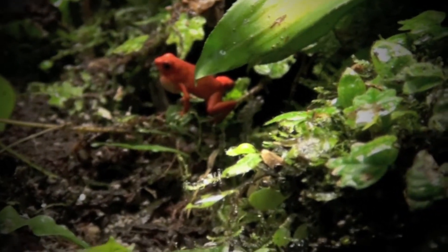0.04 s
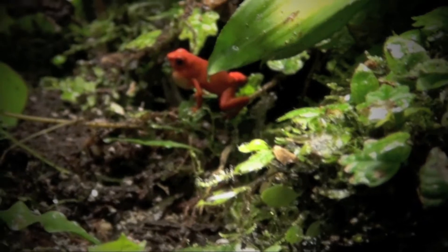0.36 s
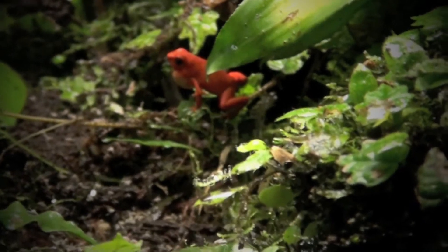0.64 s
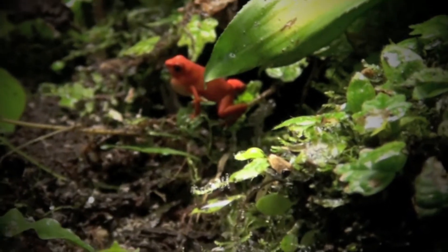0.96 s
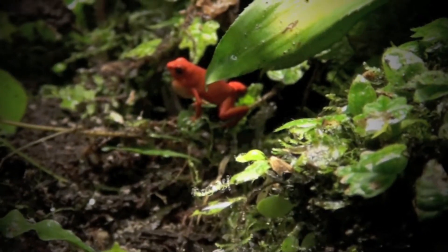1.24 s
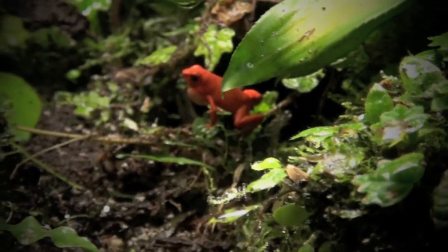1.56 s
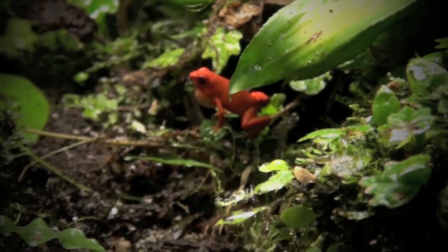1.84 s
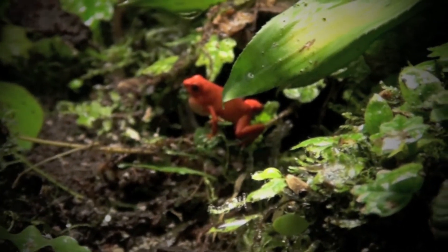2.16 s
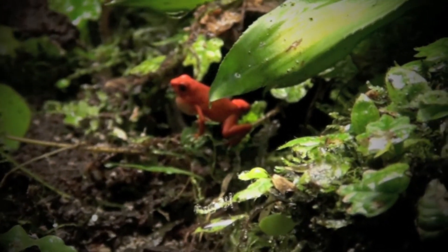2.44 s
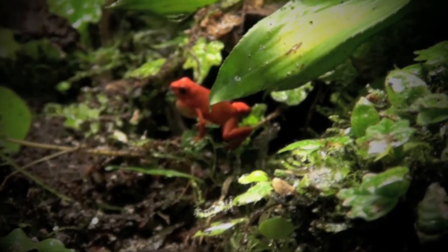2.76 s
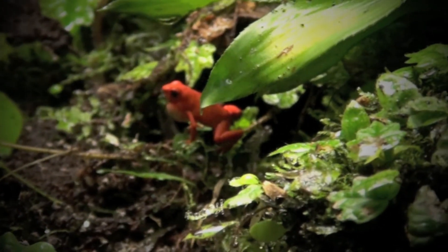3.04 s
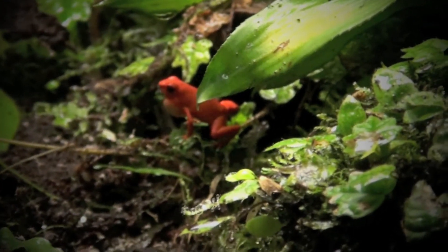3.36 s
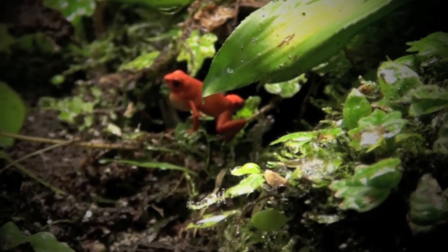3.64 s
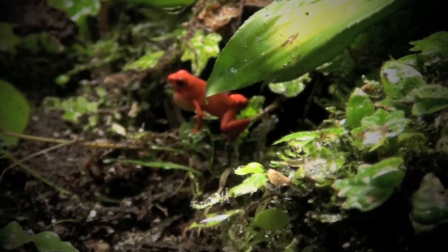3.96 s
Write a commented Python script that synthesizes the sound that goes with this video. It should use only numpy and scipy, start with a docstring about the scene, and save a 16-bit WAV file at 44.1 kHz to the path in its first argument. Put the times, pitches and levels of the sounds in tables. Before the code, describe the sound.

A tiny frog close to the microphone repeats harsh, high, buzzy chirps about six times a second without a break. The spot echoes slightly, and a faint machine hum, rumble and hiss lie behind the calls.

```python
"""In a faintly echoing spot near a humming machine, a tiny frog close by chirps six times a second.
Each chirp is a quickening train of pulses that excite the resonance of its vocal sac near 5 kHz,
with a bright overtone, a buzz of the vocal folds and a little rasp. The surroundings answer with a
short reverberant tail. Behind it lie steady hum, rumble and hiss, and a low drone swells at the end."""
import sys
import numpy as np
from scipy import signal
from scipy.fft import rfft, irfft
from scipy.io import wavfile

SR = 44100
rng = np.random.default_rng(int(sys.argv[2]) if len(sys.argv) > 2 else 0)


def persist_wave(psi):
    """Save psi, clipped to +-1, as 16-bit WAV."""
    counts = np.round(np.clip(psi, -1, 1) * 32767).astype(np.int16)
    wavfile.write(sys.argv[1], SR, np.atleast_2d(counts).T)


N = 176400
T = np.arange(N) / SR


def undb(db):
    return 10 ** (np.asarray(db) / 20)


def unit_rms(x):
    return x / np.sqrt(np.mean(x ** 2))


def stereo(mid, side):
    return np.array([mid + side, mid - side])


def impulse_response(spectrum, size=8192):
    """Minimum phase: the magnitude spectrum (Hz, dB) determines a causal response."""
    hz, db = np.array(sorted(spectrum), float).T
    bins_hz = np.maximum(np.arange(size // 2 + 1) * SR / size, 1)
    cepstrum = irfft(np.log(undb(np.interp(np.log(bins_hz), np.log(hz), db))))
    cepstrum[1:size // 2] *= 2
    cepstrum[size // 2 + 1:] = 0
    return irfft(np.exp(rfft(cepstrum)))


def colour(x, spectrum):
    """Linear filtering: convolution imposes a spectrum (Hz, dB) on a signal."""
    return signal.oaconvolve(x, impulse_response(spectrum))[:N]


def superpose(shape, times, db, pitch, size=512, oversample=8):
    """Superposition: copies of a short shape add, each at its own time, level and pitch ratio."""
    at = np.ceil(times * SR).astype(int)[:, None] + np.arange(size)
    age = (at - times[:, None] * SR) * pitch[:, None]
    fine = signal.resample_poly(shape[:size], oversample, 1)
    waves = undb(db)[:, None] * np.interp(age * oversample, np.arange(len(fine)), fine, right=0)
    inside = (at >= 0) & (at < N)
    return np.bincount(at[inside], waves[inside], N)


def noise_bursts(spectrum, times, db, burst_ms=3.2):
    """Amplitude modulation: each pulse briefly lets coloured noise through."""
    gate = np.exp(-(T[:1024] * 1000 / burst_ms) ** 4)
    envelope = superpose(gate, times, db, pitch=np.ones(len(times)))
    return envelope * unit_rms(colour(rng.standard_normal(N), spectrum))


# Each row: a chirp's first full pulse in seconds, length in ms, opening pulse gap in ms,
# time of quickening in ms, fast pulse gap in ms, relative level in dB, lead of its soft tick in ms.
CHIRPS = [(-0.0345, 54.2, 6.4, 12.9, 4.4, 0.0, 10.0), (0.1185, 47, 8.51, 17.5, 4.3, -1.4, 16),
          (0.2779, 44.8, 7.7, 8.5, 4.26, 0.5, 7.3), (0.432, 41, 8, 14.8, 4.57, 0.7, 10.6),
          (0.5754, 54.3, 8.95, 18, 3.93, -1, 12), (0.7331, 49.5, 8, 19.2, 4.1, -0.5, 13),
          (0.8961, 41.8, 8.1, 8.7, 4.2, 0.7, 10.8), (1.0429, 48, 8.2, 15.5, 4.2, -0.2, 10.6),
          (1.1982, 45.6, 6.8, 15.2, 4.3, -0.3, 10.3), (1.3506, 48.8, 7.5, 16.3, 4.05, -0.7, 7.8),
          (1.504, 48.6, 8.5, 16.2, 4.6, -0.1, 11.6), (1.665, 46.4, 8.4, 15.5, 4.2, -0.3, 6.4),
          (1.8139, 53, 9.1, 17.0, 4.35, -1, 12), (1.9651, 56.7, 8.36, 17.2, 4.9, -1, 11),
          (2.1287, 46.7, 7.9, 13.3, 4.9, 0.2, 11), (2.2842, 47.3, 8.5, 17, 3.45, -0.7, 7.8),
          (2.4342, 51.3, 8.6, 14.3, 4.17, -0.9, 10), (2.5975, 45.8, 7.87, 9, 4.35, 0.1, 10.2),
          (2.7583, 40.6, 6.6, 11.42, 4.06, -0.4, 8.4), (2.9145, 42.3, 7.54, 8.9, 4.25, 0.8, 9.2),
          (3.0638, 53.3, 7.9, 20.55, 4.4, -0.3, 10.0), (3.221, 51.4, 8.5, 17.6, 4.3, -1.1, 21),
          (3.3817, 49.3, 8.35, 15.8, 4.2, -1, 11), (3.5466, 42, 8.3, 11.4, 3.9, 0.5, 7.6),
          (3.6987, 55, 8.69, 17.33, 4.36, -1, 9.5), (3.861, 49.4, 8.1, 21, 4.7, -1, 12)]
MID_CHIRP_MS = 25

def pulse_train(count=16):
    """Pulsed excitation: two soft ticks, slow pulses that swell, then a fast run that dies away."""
    swell_ms, quicken_ms, squeeze_per_ms = 8.8, 2.0, .012
    release_db_per_ms, release_lead_ms = 2, 3.33
    spread_db, jitter_ms = 0.65, 0.056
    pulses = []  # time in seconds, ms into the chirp, level in dB
    for start, length, slow_gap, knee, fast_gap, db, lead in CHIRPS:
        tick = start - lead / 1000
        pulses += [(tick, -lead, db - 16), (tick - .01, -lead, db - 26)]
        ms = 0.
        for late, loud in rng.standard_normal((count, 2)):
            onset_db = -6.5 * np.exp(-ms / swell_ms)
            release_db = release_db_per_ms * max(ms - length + release_lead_ms, 0)
            pulses.append((start + ms / 1000, ms, db + onset_db - release_db + spread_db * loud))
            run_gap = fast_gap * (1 - squeeze_per_ms * (min(ms, length) - MID_CHIRP_MS))
            gap = run_gap + (slow_gap - run_gap) / (1 + np.exp((ms - knee) / quicken_ms))
            ms += gap + jitter_ms * late
    return np.array(pulses).T


# The ring of one pulse near 5 kHz, notched by nearby reflections.
# Each row: frequency in Hz, relative level in dB.
RING_SPECTRUM = [(1200, -47.5), (2300, -45), (2600, -45), (3000, -33.5), (3250, -38), (3700, -20),
                 (4120, -19), (4390, -8.5), (4590, -18), (4810, -3), (4965, 1), (5090, -3.5), (5270, -27),
                 (5550, -20), (5870, -15), (6170, -27.5), (6350, -24), (6650, -32.5), (7200, -35),
                 (7870, -25), (8350, -35.5), (8700, -29), (9500, -35.5), (10300, -31), (12000, -60),
                 (16000, -75)]

def vocal_sac(times, ms, db, wobble, gain_db=30, rise_per_ms=0.00023, pad=8):
    """Resonance: each pulse rings the sac, whose pitch rises as it tightens through the chirp."""
    ring = np.pad(impulse_response(RING_SPECTRUM), (pad, 0))
    pitch = 1 + rise_per_ms * (ms - MID_CHIRP_MS) + 0.0049 * wobble
    return superpose(ring, times - pad / SR, gain_db + db, pitch)


# The overtone's spectrum. Each row: frequency in Hz, relative level in dB.
OVERTONE_SPECTRUM = [(7000, -29.5), (9200, -16), (9720, -3), (9970, -15.5), (10400, 9), (10700, -4.5),
                     (11050, -9.5), (11480, -6), (12000, -25), (13000, -42), (16000, -54)]

def overtone(times, ms, db, wobble, gain_db=9.5, rise_per_ms=0.00062, lag_s=.0014, open_ms=7.3):
    """Upper resonance: a ring near 10 kHz follows each pulse and opens up over the first few."""
    ring = np.pad(impulse_response(OVERTONE_SPECTRUM), (8, 0))
    closed_db = -10.5 * np.exp(-np.maximum(ms, 0) / open_ms)
    pitch = 1 + rise_per_ms * (ms - MID_CHIRP_MS) + 0.0097 * wobble
    return superpose(ring, times + lag_s, gain_db + db + closed_db, pitch)


# The buzz's spectrum. Each row: frequency in Hz, relative level in dB.
BUZZ_SPECTRUM = [(3000, -32), (5500, -2), (6600, 2), (7200, -3), (7850, 0), (9000, 0), (9900, 2),
                 (10500, -6), (11500, -12), (12100, -22), (16000, -33)]

def fold_buzz(times, db, gain_db=-29.5):
    """Gated noise: the vocal folds buzz while each pulse lasts."""
    return noise_bursts(BUZZ_SPECTRUM, times, gain_db + db)


# The rasp's spectrum. Each row: frequency in Hz, relative level in dB.
RASP_SPECTRUM = [(1500, -14), (2600, -5), (4000, -0.5), (6000, 2.5), (9000, -4), (11500, 11),
                 (13000, -5), (15000, -4), (16000, -25)]

def rasp(times, ms, db, gain_db=-37.5, growth_db_per_ms=0.475):
    """Broadband noise: its bursts grow towards the end of a chirp."""
    growth_db = growth_db_per_ms * (np.minimum(ms, 43) - MID_CHIRP_MS)
    return noise_bursts(RASP_SPECTRUM, times, gain_db + db + growth_db)


def frog(dulling_db_per_ms=0.63):
    """Source and filter: one pulse train drives the voice; soft or late pulses sound duller."""
    times, ms, db = pulse_train()
    sac_wobble, overtone_wobble = rng.standard_normal((len(ms), 2)).T
    bright_db = 1.56 * np.minimum(db, 0) - dulling_db_per_ms * np.maximum(ms - MID_CHIRP_MS, 0)
    tonal = vocal_sac(times, ms, db, sac_wobble) + overtone(times, ms, bright_db, overtone_wobble)
    return tonal + fold_buzz(times, bright_db) + rasp(times, ms, db)


# The colour of scattered sound. Each row: frequency in Hz, gain in dB.
SCATTER_SPECTRUM = [(2500, -1.5), (3700, 6.5), (4350, 0.5), (4600, 6.5), (4950, -1), (5100, 0), (5300, 20),
                    (5550, 7.5), (5870, 1.5), (6600, 9.5), (7900, 3), (9500, 5.5), (10400, -2), (12000, -4),
                    (16000, -4)]
# Each row: a diffuse tail's delay in seconds, 60 dB decay time in seconds, gain in dB, width 0 to 1.
REFLECTIONS = [(.0035, .05, -20, 0.92), (0.015, 0.384, -18.5, 0.53)]
# Each row: a mode's frequency in Hz, 60 dB decay time in seconds, gain at its centre in dB.
MODES = [(3940, 1, -11), (4390, .8, -8), (5360, 0.58, -20), (5230, .8, -10), (5200, .8, -18),
         (5909, 0.46, -2.5), (6600, 0.39, -1)]

def surroundings(call):
    """Reverberation: diffuse reflections and a few narrow modes decay exponentially."""
    t = T[:SR]
    response = np.zeros((2, SR))
    for delay, t60, db, width in REFLECTIONS:
        tail = rng.standard_normal((2, SR)) * (t > delay) * np.exp(-np.log(1000) * t / t60)
        mid, side = undb(db) * tail / np.sqrt(np.sum(tail ** 2, axis=1, keepdims=True))
        response += stereo(mid, width * side)
    for hz, t60, db in MODES:
        damping = np.log(1000) / t60
        phase = 2 * np.pi * hz * t + 0.28 * rng.standard_normal((2, 1))
        response += undb(db) * 2 * damping / SR * np.exp(-damping * t) * np.sin(phase)
    scattered = colour(call, SCATTER_SPECTRUM)
    return signal.fftconvolve(scattered[None], response, axes=1)[:, :N]


# The background noise. Each row: frequency in Hz, relative spectral density in dB.
NOISE_SPECTRUM = [(20, -9.5), (35, -6), (70, -4), (130, -4), (250, -1), (400, -4), (560, -3.5),
                  (750, -10.5), (950, -9), (1200, -15.5), (2500, -16.5), (7000, -20), (12000, -17),
                  (16000, -22.5)]
# Its stereo width. Each row: frequency in Hz, level of side against mid in dB.
NOISE_WIDTH = [(30, -21), (70, -17), (160, -9), (500, -4), (900, 1), (1500, 3.5), (3000, -0.5), (8000, -21),
               (15000, -58)]

def rumble_and_hiss(level_db=-41.5):
    """Partial coherence: independent mid and side noises make a bed widest in the midrange."""
    mid, side = (unit_rms(colour(rng.standard_normal(N), NOISE_SPECTRUM)) for _ in range(2))
    return undb(level_db) * stereo(mid, colour(side, NOISE_WIDTH))


def drift(rate_hz):
    """Interpolation between random values gives a slow wander."""
    knots = rng.standard_normal(int(rate_hz * T[-1]) + 3)
    return 0.73 * np.interp(T * rate_hz + rng.random(), np.arange(len(knots)), knots)


def wavering_tone(hz, db, waver_db, width):
    """Phase difference: a sinusoid of wavering level reaches the two sides out of step."""
    phase = 2 * np.pi * (hz * T + rng.random())
    amplitude = np.sqrt(2) * undb(db) * (1 + (undb(waver_db) - 1) * drift(rate_hz=4.2))
    return amplitude * stereo(np.sin(phase), width * rng.choice([-1, 1]) * np.cos(phase))


# Each row: a hum partial's frequency in Hz, rms level in dB.
HUM_PARTIALS = [(50, -62), (100, -60), (125.2, -54), (200, -60), (225.5, -56), (325.3, -56.5), (334.5, -44),
                (350.2, -57), (386, -50.5), (425.5, -56), (434.5, -45.5), (450.3, -45), (460.3, -44.5),
                (475.3, -55), (486, -53), (534.7, -47), (625.5, -62)]

def machine_hum():
    """Line spectrum: a steadily running machine radiates at constant frequencies."""
    return sum(wavering_tone(hz, db, waver_db=.7, width=0.11) for hz, db in HUM_PARTIALS)


# Each row: a drone's frequency in Hz, rms level at its peak in dB, peak time and spread in seconds.
DRONE_TONES = [(71.3, -44.5, 3.73, 0.24), (128, -53.5, 1.05, 0.37), (145.3, -49, 3.93, .17),
               (230, -52, 3.08, 0.38), (234, -46, 3.86, 0.14), (297, -51, 3.63, .3), (1690, -57, 3.97, .1)]

def distant_drone():
    """Slow amplitude modulation: each tone swells and fades under a Gaussian envelope."""
    return sum(np.exp(-((T - peak) / spread) ** 2) * wavering_tone(hz, db, waver_db=1.5, width=0.092)
               for hz, db, peak, spread in DRONE_TONES)


def scene():
    """Superposition: the direct call, its reverberation and the background add."""
    call = frog()
    return call + surroundings(call) + rumble_and_hiss() + distant_drone() + machine_hum()


def record(dry):
    """Band limiting: a steep low-pass filter removes the treble above 15.9 kHz."""
    return signal.sosfilt(signal.ellip(10, .1, 80, 15900, fs=SR, output="sos"), dry)


dry = scene()
out = record(dry)
persist_wave(out)
```